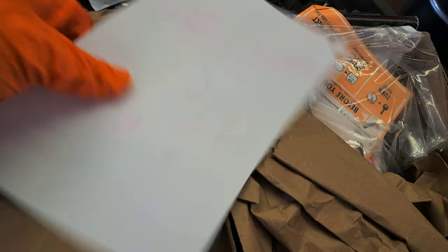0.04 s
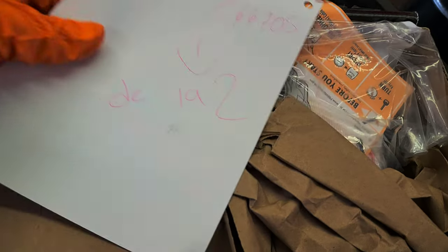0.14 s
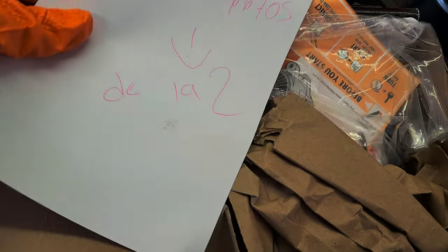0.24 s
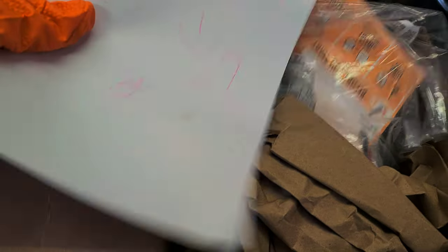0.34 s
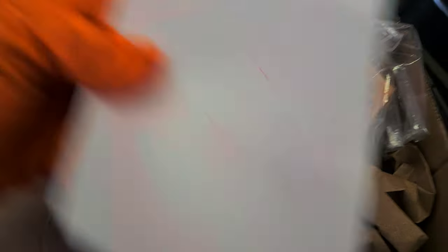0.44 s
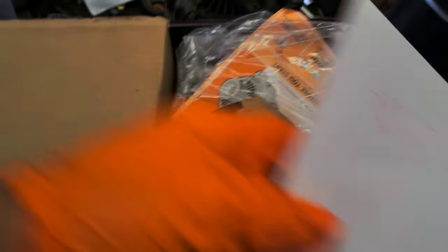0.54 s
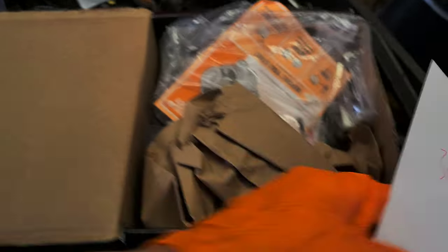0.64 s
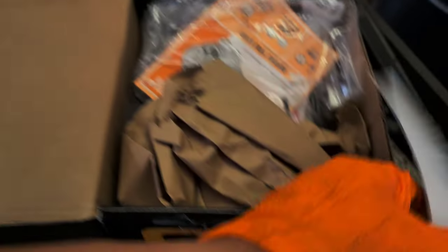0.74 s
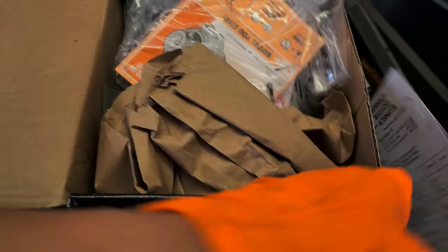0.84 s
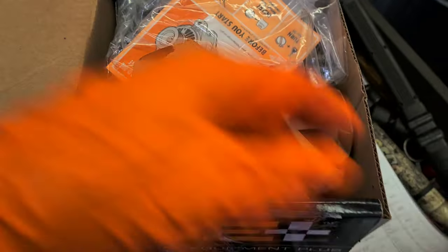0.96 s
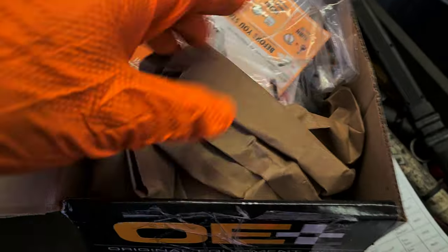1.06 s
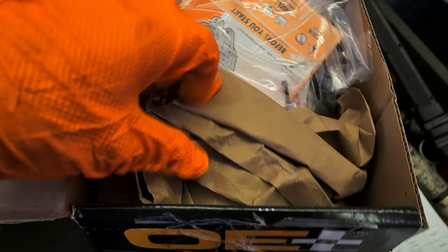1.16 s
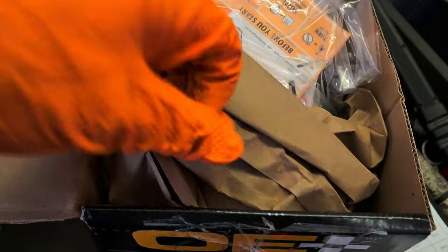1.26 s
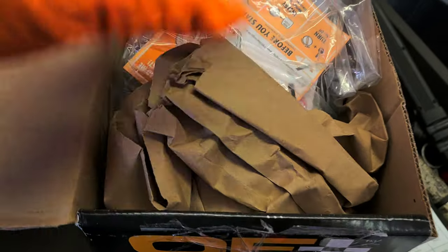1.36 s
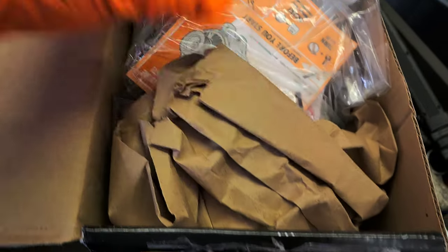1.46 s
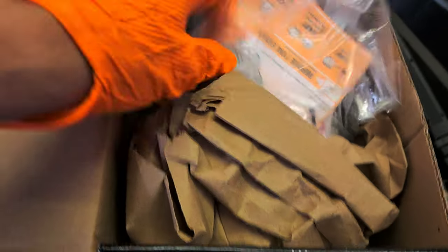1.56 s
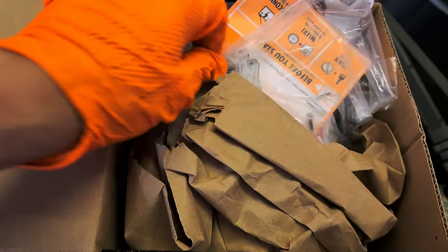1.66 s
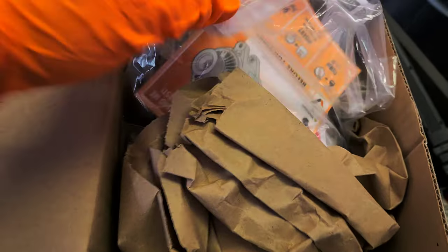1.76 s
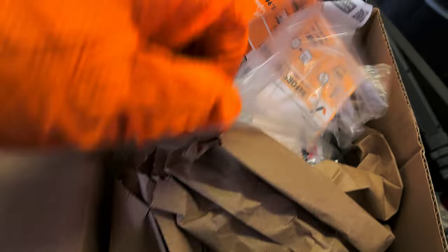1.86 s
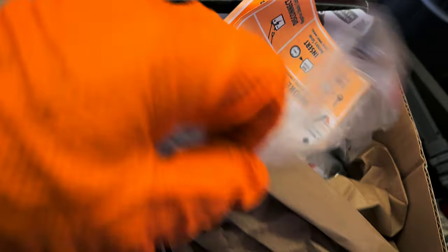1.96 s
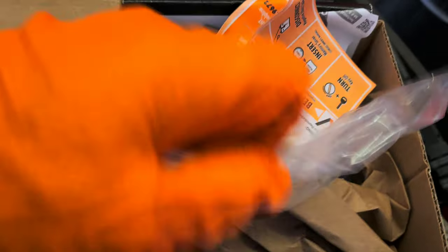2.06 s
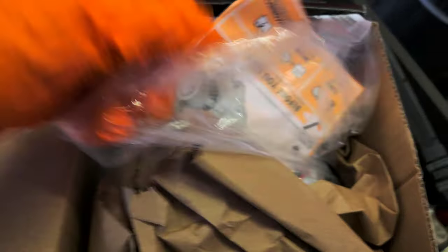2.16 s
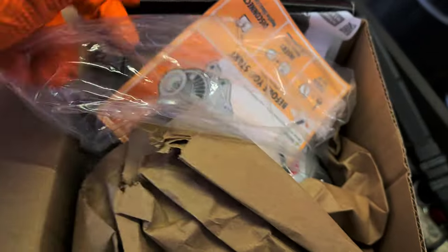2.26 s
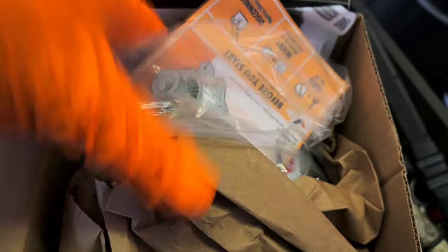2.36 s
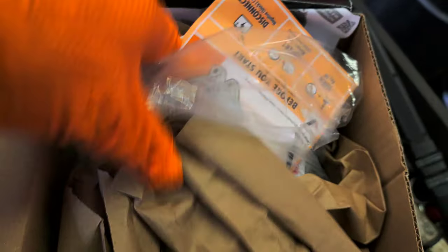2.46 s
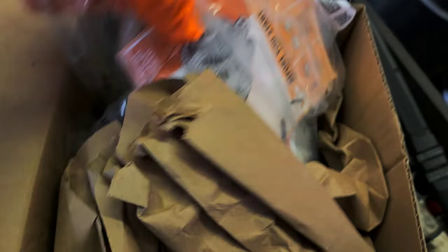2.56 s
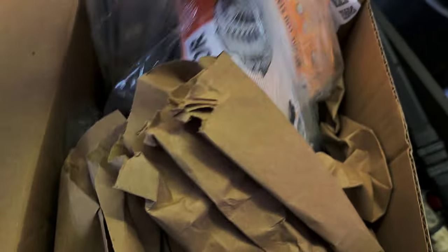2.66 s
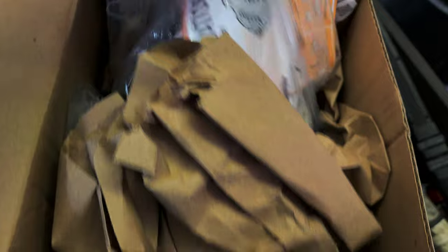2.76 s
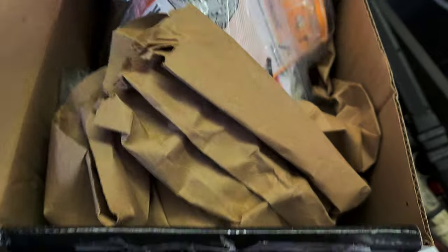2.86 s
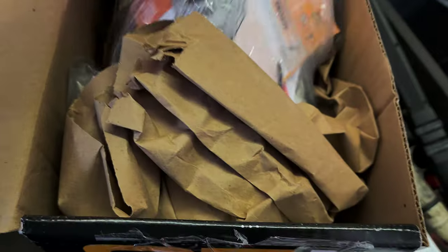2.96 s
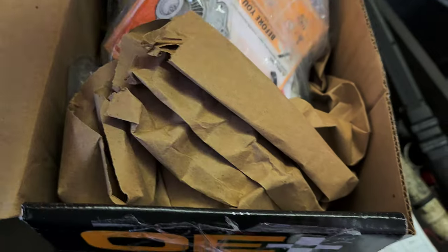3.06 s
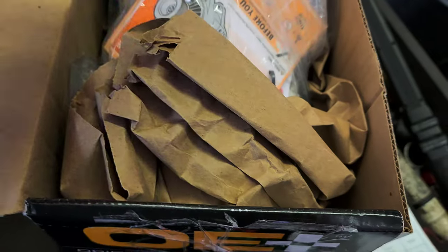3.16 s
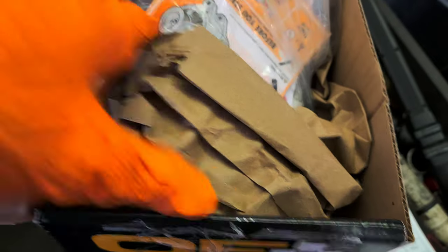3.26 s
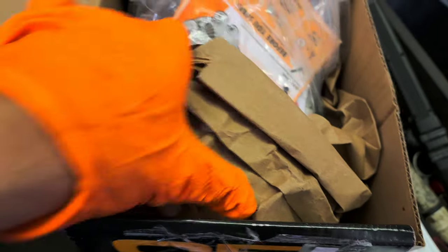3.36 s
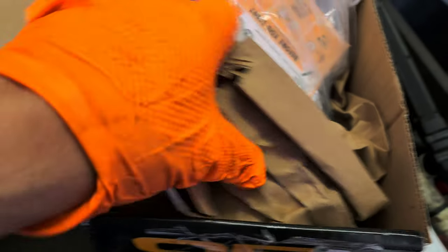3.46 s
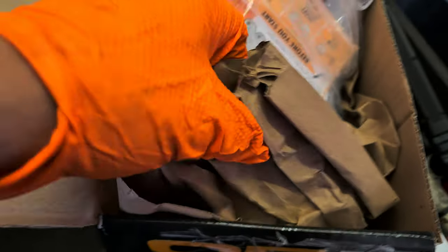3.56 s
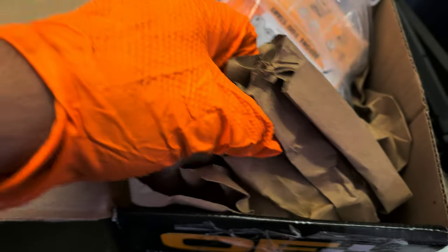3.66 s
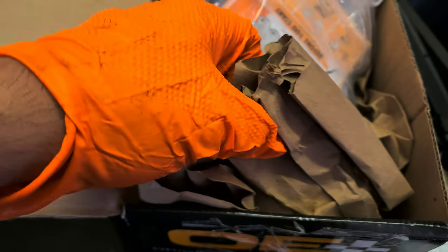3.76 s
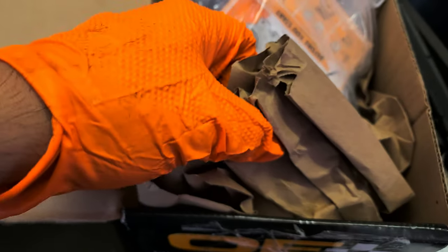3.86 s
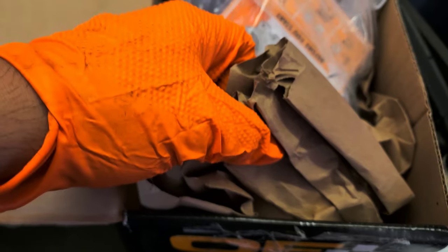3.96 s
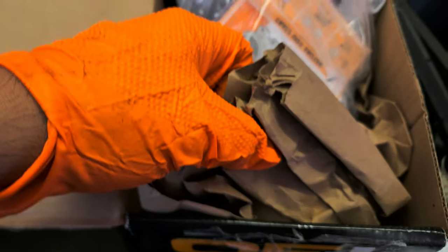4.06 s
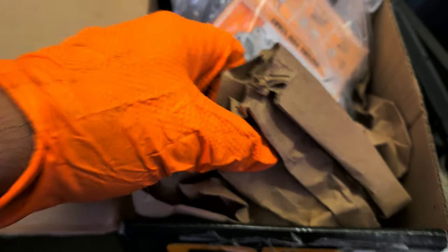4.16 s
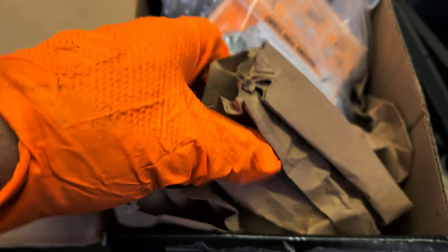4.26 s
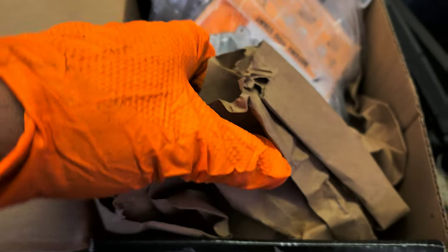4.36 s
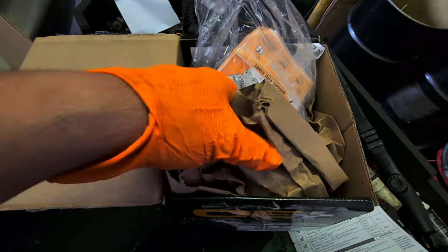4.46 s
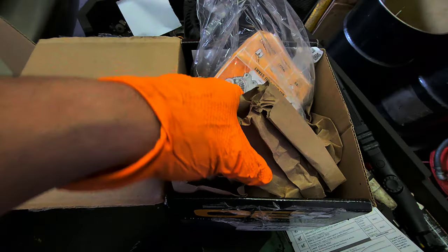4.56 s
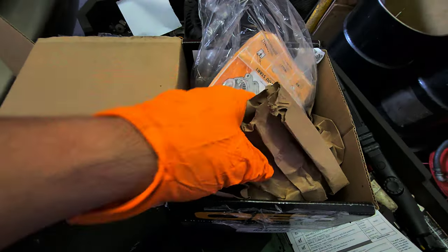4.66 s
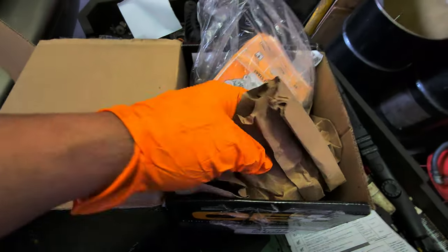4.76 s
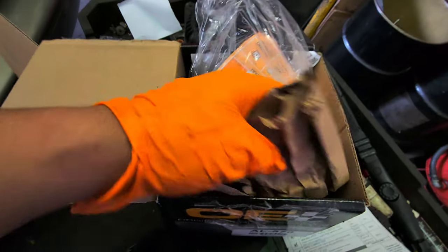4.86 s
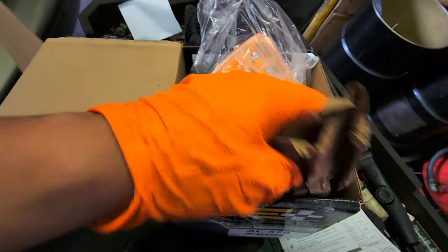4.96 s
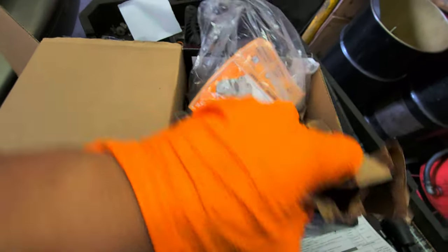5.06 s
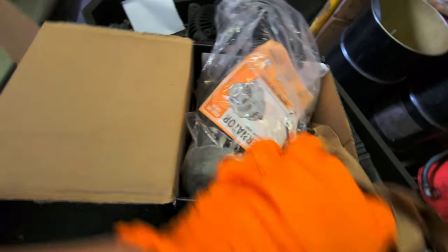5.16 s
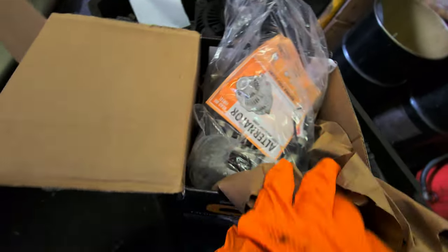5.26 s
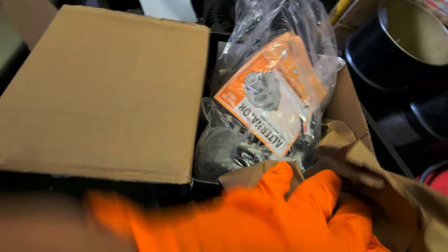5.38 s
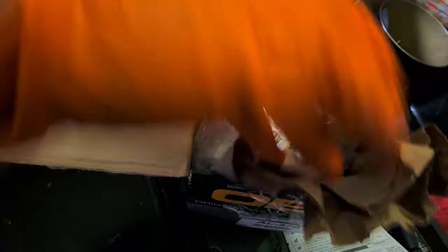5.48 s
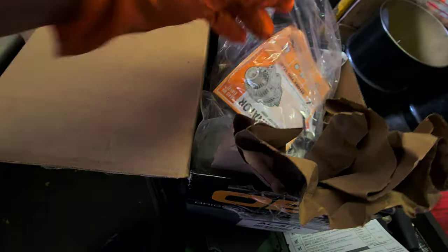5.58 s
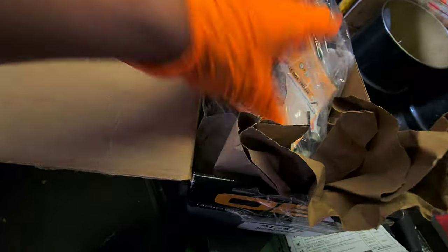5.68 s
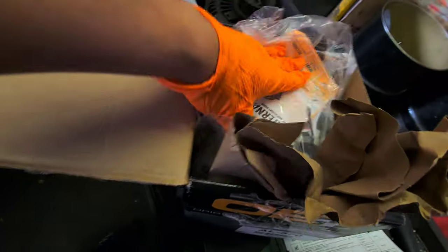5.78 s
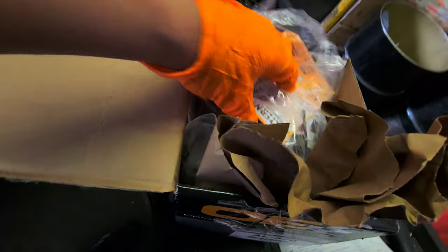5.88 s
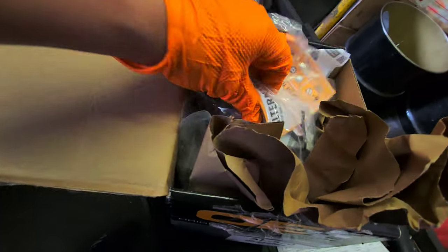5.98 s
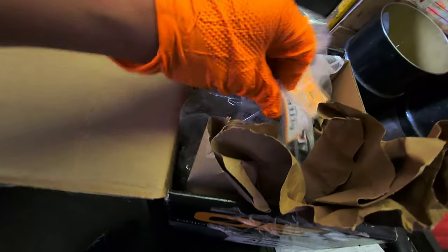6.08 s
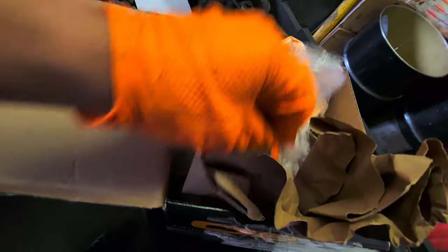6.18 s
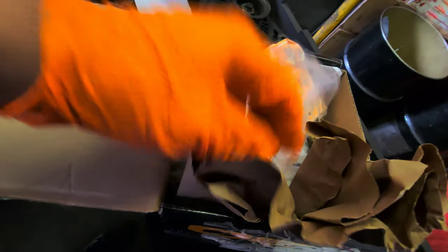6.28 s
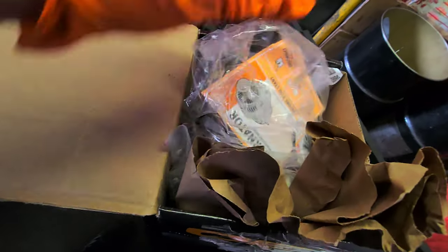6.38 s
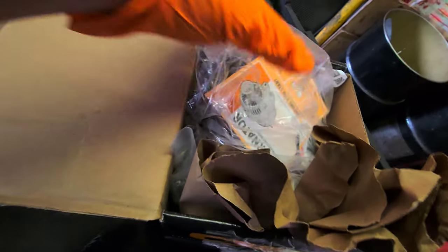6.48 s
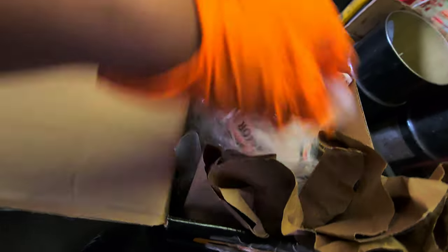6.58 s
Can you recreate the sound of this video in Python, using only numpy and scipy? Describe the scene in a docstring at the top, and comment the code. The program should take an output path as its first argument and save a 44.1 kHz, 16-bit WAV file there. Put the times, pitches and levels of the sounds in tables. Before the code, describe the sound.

A hand rummages in a box: a thump and clack, crinkling plastic, crunching stiff paper, then thin metal ringing and wavering in a quiet workshop.

```python
"""Rummaging in a cardboard box

A gloved hand moves packing paper and a plastic bag close to the microphone, in a workshop.
Crackle is many tiny random pops, swelling with each stroke of the hand; large creases add pitched snaps.
A thin metal part, perhaps a washer, drops and rings in pairs of close tones as the bag is pressed again.
Box bumps and a knocked tool are decaying tones and noise; scrapes, faint tones, ticks and pats are shaped noise.
A faint long reverberation and quiet, coloured noise for the air lie behind."""
import sys
import numpy as np
from scipy import signal
from scipy.fft import rfft, irfft
from scipy.io import wavfile
from scipy.ndimage import uniform_filter1d, minimum_filter1d

SR = 44100
rng = np.random.default_rng(int(sys.argv[2]) if len(sys.argv) > 2 else 0)


def dump(signal):
    """Clip the signal to [-1, 1] and save it as 16-bit WAV at the path in sys.argv[1]."""
    limited = np.clip(np.atleast_2d(signal).T, -1, 1)
    pcm = np.round(limited * 32767).astype(np.int16)
    wavfile.write(sys.argv[1], SR, pcm)


N = 292383
T = np.arange(N) / SR  # time in seconds


# Tone colour of stiff paper: pitch_hz, level_db
PAPER_COLOUR = [(47, -64), (80, -13), (190, -12), (309, -6), (482, -4), (550, 4), (687, -8.5), (896, -5),
                (1020, -2), (1700, -19.5), (4230, -21.5), (8600, -14), (10700, -43), (14300, -25.5),
                (16000, -39)]
# The hand moves the paper: start_s, rise_s, hold_s, crackle_db, body_over_crackle_db, fizz_over_crackle_db
PAPER_STROKES = [(0.061, 0.043, 0.031, -52, 4.5, 12), (0.411, 0.015, 0.0049, -40.5, 17, 8.5),
                 (1.222, 0.011, 0.048, -27.5, -5, -6), (1.322, 0.018, 0.012, -36, -5.5, 2),
                 (3.453, 0.079, 0.017, -42, -3.5, 4.5), (3.565, 0.02, 0.039, -26, -2.5, -3),
                 (4.333, 0.011, 0.012, -40.5, -4.5, -5), (4.748, 0.0039, 0.05, -27, -17, -7),
                 (4.803, 0.023, 0.059, -35.5, -1.5, -10), (4.882, 0.0022, 0.046, -23.5, -3, -5),
                 (4.921, 0.0035, 0.091, -21, -4.5, -7.5), (5.028, 0.024, 0.17, -28, -5.5, -11.5),
                 (5.154, 0.016, 0.12, -21, -1, -9), (5.287, 0.022, 0.11, -23.5, -13, -4.5),
                 (5.471, 0.037, 0.04, -26, -9, -4.5), (5.645, 0.026, 0.078, -52, 5, 18)]
# Time for the relaxing paper to fall 60 dB: body_s, crackle_s, fizz_s
PAPER_RELAX_S = [0.34, .24, .21]


def paper():
    """Stiff paper: sparse, strong pops over the hollow sound of the wad."""
    grain = crinkle(PAPER_COLOUR, rate=600, spread_db=0.5, t60=0.0045, echo_db=-14.5)
    grain = folds(grain, depth_db=6.0, q=6.9, rate=12)
    return rustle(grain, PAPER_STROKES, PAPER_RELAX_S)


# Tone colour of the loose bag: pitch_hz, level_db
BAG_COLOUR = [(70, -4), (200, -7), (320, -5), (480, 1), (720, -6.5), (1050, -2.5), (1700, -14), (3300, -5),
              (4400, 1), (5800, -1), (8700, 7), (10400, -15.5), (12500, -7), (15000, -7.5)]
# Tone colour of the bag pressed into the box: pitch_hz, level_db
PRESSED_COLOUR = [(55, 15), (180, -9.5), (370, 8.5), (520, 10.5), (760, -5.5), (1100, -3), (1800, -15.5),
                  (3400, -9.5), (4400, 1), (7000, 9), (9000, 3), (11000, -5), (13000, -3), (15000, -2.5)]
# The hand moves the loose bag: start_s, rise_s, hold_s, crackle_db, body_over_crackle_db, fizz_over_crackle_db
BAG_STROKES = [(1.235, 0.035, 0.0048, -22.5, -4.5, 3.5), (1.56, 0.013, 0.035, -55, 1.5, -6.5),
               (1.624, 0.026, 0.013, -42, 0.5, 7.5), (1.761, 0.052, 0.044, -55.5, -3, 11.5),
               (1.833, 0.049, 0.041, -29.5, -2, 4), (1.981, 0.023, 0.06, -43, -3, 5),
               (2.066, 0.024, 0.033, -30.5, -11.5, 0), (2.114, 0.024, 0.074, -35.5, -9, 2.5),
               (2.236, 0.014, 0.061, -32, -9, 4), (2.358, 0.034, 0.056, -53.5, 4.5, 5),
               (2.419, 0.091, 0.082, -34.5, -3.5, 3.5), (2.549, 0.02, .042, -18.5, -1, -3),
               (2.616, 0.028, 0.17, -31.5, -10.5, 3.5), (2.813, 0.066, 0.017, -25.5, -1, 4.5),
               (2.927, 0.1, 0.053, -32, -3.5, 4.5), (3.145, 0.046, 0.15, -65.5, 8, -21),
               (3.314, 0.022, 0.032, -43, 0, -0.5)]
# The hand presses the bag: start_s, rise_s, hold_s, crackle_db, body_over_crackle_db, fizz_over_crackle_db
PRESS_STROKES = [(5.755, 0.056, 0.016, -19.5, -7.5, 1), (5.835, 0.044, 0.084, -32, 4, 6),
                 (5.991, .012, 0.012, -24, 0, 5), (6.052, 0.046, 0.2, -34, 1, 7),
                 (6.334, 0.038, 0.021, -42, 6.5, 6), (6.529, 0.12, 0.029, -56.5, 1, -10.5)]
# Time for the relaxing bag to fall 60 dB: body_s, crackle_s, fizz_s
BAG_RELAX_S = [0.2, 0.19, 0.18]


def bag():
    """Thin plastic: a finer crinkle, boxier when it is pressed against the cardboard."""
    loose = crinkle(BAG_COLOUR, rate=800, spread_db=2.0, t60=0.0079, echo_db=-11)
    loose = folds(loose, depth_db=4.0, q=14, rate=10)
    pressed = crinkle(PRESSED_COLOUR, rate=1200, spread_db=4.0, t60=0.0018, echo_db=-11)
    pressed = folds(pressed, depth_db=6.0, q=8.0, rate=12)
    return rustle(loose, BAG_STROKES, BAG_RELAX_S) + rustle(pressed, PRESS_STROKES, BAG_RELAX_S)


# Creases that buckle with a snap, levels before mixing; the first row gives the sharp edge of a knock on the
# box: start_s, level_db, pitch_hz, hollow_knock_db
SNAPS = [(1.043, -2.5, 2150, -10.5), (1.114, -20.5, 3880, -25.5), (1.234, -1, 4040, -10.5),
         (1.259, -4.5, 4150, -11), (1.275, 0.5, 4270, -5.5), (1.28, -10, 4350, -13),
         (1.385, -8.5, 4300, -21), (1.395, -18.5, 2700, -16.5), (1.845, -13, 4700, -28),
         (1.896, 2.5, 2780, -13.5), (2.073, -19, 4400, -16), (2.091, -18, 4470, -19), (2.252, 2, 2685, -30),
         (2.326, -10, 9220, -47), (2.495, -9, 5020, -41), (2.782, -18, 4530, -23), (2.567, 1, 4360, -7),
         (2.593, 24.5, 2600, 9.5), (2.605, -26, 2540, -11.5), (2.887, -7, 3590, -19),
         (2.955, -11.5, 4700, -44), (3.584, -16, 2180, -20), (3.624, -4.5, 1880, -13.5),
         (3.653, -5, 1710, -8.5), (4.751, -13.5, 2004, -19), (4.761, -12, 2920, -22.5),
         (4.778, 4, 3900, -8), (4.885, -4, 2080, -14), (4.929, 1.5, 3560, -6), (4.984, 6.5, 3000, -4.5),
         (5.022, -3.5, 2900, -8), (5.088, -3.5, 1910, -9.5), (5.168, 2, 2850, -9.5), (5.2, 0, 5980, -6.5),
         (5.209, -2, 2590, -12), (5.221, -0.5, 3000, -1.5), (5.256, 2, 2050, -15.5),
         (5.28, -0.5, 3740, -22), (5.999, -2, 6470, -30), (6.153, -11.5, 2620, -16.5),
         (6.225, -26, 5600, -20)]
# The hollow of the paper wad: pitch_hz, level_db
WAD_COLOUR = [(100, -27), (280, -14), (520, -7.5), (750, -11.5), (1040, -2), (1350, -6), (2000, -14.5),
              (6000, -32.5)]


def snaps():
    """A large crease gives way: a pitched tick, a crack, reflections, and a hollow knock from the wad."""
    out, t = np.zeros(N), T[:SR // 4]
    crack_colour = [(400, -10.0), (1700, -0.5), (8500, 5.5), (10500, -6), (15000, -1.5)]  # Hz, dB
    for start, db, hz, hollow_db in SNAPS:
        tick = np.sin(2 * np.pi * hz * t) * fade(t, 0.016) * np.minimum(t / 0.00038, 1)
        crack = pop(hz, 0.012, q=2.0, echo_db=-17, echo_t60=0.16)
        crack = burst(colour(crack, crack_colour), 0.0011)
        knock = pop(1000, 0.0084, q=1, echo_db=-11.5, echo_t60=0.15)
        knock = burst(colour(knock, WAD_COLOUR), 0.0038)
        snap = undb(db) * (undb(-10.0) * tick + undb(-11.0) * crack)
        add(out, start + 0.0011, snap + undb(hollow_db - 7.0) * knock)
    return out


# The washer is jostled in the paper, drops and spins, then tips over and spins again:
# start_s, length_s, ring_db, rim_chatter_db
SPINS = [(4.84, 0.41, -31.5, -54), (5.307, 0.34, 2, -11), (5.653, 0.647, -.5, -25.5)]
# Its tones in close pairs, one list for each row of WASHER_RING: pitch_hz, level_db
WASHER_MODES = [
    [(2586, -3), (2597, -5)],
    [(5560, -3), (5604, 0.5)],
    [(10131, -11), (10228, -2.5)],
    [(15552, -9), (15692, -11)],
]
# How each pair answers a spin: level_db, rise_s, hold_s, time_to_fall_60_db_s, db_gained_per_db_of_force
WASHER_RING = [(-18, 0.083, 0.074, 1.3, 1.46), (-10.5, 0.033, 0.18, 0.91, 1.5),
               (-15, 0.016, 0.078, 1.28, 1), (-18.5, .012, .06, 0.84, 2.5)]
# Tone colour of the rim contacts: pitch_hz, level_db
CHATTER_COLOUR = [(2500, -39.5), (5000, -7), (7000, -2.5), (9800, -6.5), (12500, -9.5), (15700, -9.5)]
CHATTER_T60_S, STOP_T60_S = 0.59, 0.33  # the rim quietens; the ring is damped when a spin ends


def washer():
    """Each spin rings and dies; mode pairs beat and waver at random, rim contacts add a buzz at their pitches."""
    rim = crinkle(CHATTER_COLOUR, rate=1700, spread_db=4.5, t60=0.0018, echo_db=-14.5)
    rim = steady(rim, 0.075)
    out, swings = 0, 0
    for start, length, ring_db, chatter_db in SPINS:
        free = fade(np.maximum(T - start - length, 0), STOP_T60_S)
        out = out + undb(chatter_db) * swell(start, 0.015, 0.011, CHATTER_T60_S) * free * rim
        answers = [undb(ring_db * slope + db) * swell(start, rise, hold, t60)
                   for db, rise, hold, t60, slope in WASHER_RING]
        swings = swings + free * np.array(answers)
    for swing, modes in zip(swings, WASHER_MODES):
        for hz, db in modes:
            # phase and level waver at random
            phase_waver = 1.15 * walk(24) + .15 * hz / 5600 * walk(130)
            ring = undb(1.7 * walk(28)) * np.sin(2 * np.pi * hz * T + phase_waver)
            # the buzz of the short contacts is strongest in the high modes
            filtered_rim = resonate(resonate(rim, hz, hz / 110), hz, hz / 110)
            buzz = unit(filtered_rim) * undb(-12) * hz / 5600
            out = out + undb(db) * swing * (ring + buzz)
    return out


# Bumps on the box, before the overall fade: start_s, level_db, rise_s, time_to_fall_60_db_s, bass_db, treble_db
BUMPS = [(0.0, -38, 0.0035, 0.38, 1, -4), (0.714, -5.5, 0.018, 1, 1.5, 9.5),
         (1.041, -14.5, .001, 0.28, -28.5, 9)]
# Tones of the box and its load: pitch_hz, level_db
BOX_MODES = [(52, -7.5), (64, -3), (88, -1.5), (140, -2.5), (188, -3), (240, -3), (311, -9), (328, -4.5),
             (362, 1.5), (398, -0.5), (419, 6), (473, 1), (496, 1.5), (789, -2.5), (854, -20)]
# Tone colour of rattling or scraped cardboard: pitch_hz, level_db
THUMP_COLOUR = [(40, -9.5), (70, -13.5), (139, -7.5), (260, -5.5), (400, 0.5), (560, -5), (880, -2.5),
                (1150, -14), (1600, -24), (2300, -24.5), (3400, -22.5), (4900, -34), (7500, -36),
                (11000, -65)]


def box():
    """Each bump shakes the loaded box: low modes boom, the cardboard and its contents rattle."""
    out, t = np.zeros(N), T[:SR]
    for start, db, rise, t60, bass_db, treble_db in BUMPS:
        boom = sum(undb(d) * np.sin(2 * np.pi * (hz * t + rng.random())) for hz, d in BOX_MODES)
        rattle = colour(rng.standard_normal(SR), THUMP_COLOUR)
        bass, middle, treble = split(undb(-5.0) * unit(boom) + undb(-2.0) * unit(rattle), 300, 2200)
        # the treble rises more slowly and dies sooner than the body
        treble = undb(treble_db - 3.0) * treble * np.minimum(t / (2.1 * rise), 1) * fade(t, 4.8)
        ring = undb(bass_db) * bass + middle + treble
        envelope = np.minimum(t / rise, 1) ** 2 * fade(t, t60) * fade(t ** 2, 0.36)
        add(out, start, undb(db) * ring * envelope)
    return out


# A hard tool is knocked and rebounds: start_s, level_db, time_to_fall_60_db_s
CLACKS = [(0.9257, -8, 0.047), (0.937, -11.5, 0.24)]
# Tone colour of the knocks: pitch_hz, level_db
CLACK_COLOUR = [(300, -14), (1500, -3.5), (2400, 0.5), (3400, 1.5), (4500, -2), (5500, -4), (7600, 2),
                (9200, -24.5), (15000, -48)]
# The ring of the tool: pitch_hz, level_db, time_to_fall_60_db_s
TOOL_MODES = [(2128, -14, .3), (2665, -22, .2), (4129, -22, .2), (4576, -15, .08), (6977, -25, .18),
              (7467, -31, .2)]


def tool():
    """Two hard contacts give fading noise; a brief metallic ring of several tones starts with the first."""
    out, t = np.zeros(N), T[:SR]
    for start, db, t60 in CLACKS:
        clack = unit(colour(rng.standard_normal(SR), CLACK_COLOUR))
        add(out, start, undb(db) * clack * fade(t, t60))
    ring = sum(undb(db) * np.sin(2 * np.pi * hz * t) * fade(t, t60) for hz, db, t60 in TOOL_MODES)
    add(out, CLACKS[0][0], ring)
    return out


# Glove or sheet scrapes the cardboard:
# start_s, rise_s, hold_s, crackle_db, body_over_crackle_db, fizz_over_crackle_db
SCRAPE_STROKES = [(0.0, .005, .02, -57.5, 23, 4), (0.038, .03, .06, -62.5, 18.5, -9.5),
                  (1.078, .025, .03, -44, 11.5, 4.5), (1.187, .01, .03, -38, 4, 0.5),
                  (1.222, .05, .006, -30, 5.5, -8.5), (1.372, .01, .025, -39.5, 0, 1)]
# Time for a scrape to fall 60 dB: body_s, crackle_s, fizz_s
SCRAPE_RELAX_S = [0.21, 0.073, 0.22]


def scrapes():
    """Fine friction on the cardboard, coloured by the hollow box."""
    grain = colour(rng.standard_normal(N), THUMP_COLOUR)
    grain = folds(grain, depth_db=5.5, q=16, rate=9)
    return rustle(grain, SCRAPE_STROKES, SCRAPE_RELAX_S)


# Faint narrow tones, hollow near 1 kHz or higher: start_s, hold_s, pitch_hz, sharpness_q, level_db
FAINT_TONES = [(0.0, 0.12, 980, 5, -43), (0.421, .05, 987, 3.9, -38.5), (1.042, .06, 1034, 6, -31),
               (0.0, .11, 4170, 5.4, -53.5), (0.22, 0.069, 3730, 18, -65), (0.266, .02, 6620, 9, -50.5),
               (3.132, 0.11, 4420, 9.4, -55), (6.412, 0.19, 6600, 9.2, -62), (6.541, 0.077, 4830, 13, -58)]
FAINT_RISE_S, FAINT_T60_S = 0.022, 0.82


def faint_tones():
    """Narrow noise: hollow near 1 kHz like the room or box resonating, or higher like sliding friction."""
    return sum(undb(db) * swell(start, FAINT_RISE_S, hold, FAINT_T60_S) * hum(hz, q)
               for start, hold, hz, q, db in FAINT_TONES)


# Light ticks as the load shifts: start_s, level_db
TICKS = [(3.741, -39), (4.296, -55), (4.68, -62)]
# Their damped resonances: pitch_hz, sharpness_q, level_db
TICK_TONES = [(2176, 7.6, -1.4), (4470, 15.5, -0.74)]
TICK_T60_S = .17


def ticks():
    """Light contacts inside the packing ring briefly, blurred by the wrapping."""
    ring = sum(undb(db) * hum(hz, q) for hz, q, db in TICK_TONES)
    return ring * sum(undb(db) * swell(start, 0.0047, 0, TICK_T60_S) for start, db in TICKS)


# The glove lands softly on the packing: start_s, pitch_hz, level_db, time_to_fall_60_db_s
PATS = [(3.311, 117, -38, 0.1), (4.421, 190.8, -55.5, 0.099)]


def pats():
    """A soft glove on a loose load: one dull, low resonance."""
    return sum(undb(db) * swell(start, 0.0089, 0.045, t60) * hum(hz, 1.7) for start, hz, db, t60 in PATS)


# Tone colour of the reverberation: pitch_hz, level_db
ROOM_COLOUR = [(80, -15), (350, -5), (650, -1.5), (950, -5), (1300, -12.5), (2200, -21.5), (8000, -41)]
# Tone colour of the still air: pitch_hz, level_db
AIR_COLOUR = [(40, 1), (200, -6.5), (750, 3.5), (1800, -13.5), (5000, -11), (11000, -19), (14000, -22)]
AIR_DB = -63  # middle level; it wavers a little


def workshop(x):
    """A faint, long, mid-pitched reverberation, made with fading noise, over still air."""
    t = T[:2 * SR]
    tail = colour(rng.standard_normal(len(t)), ROOM_COLOUR) * fade(t, 1.8) * np.minimum(t / 0.024, 1)
    wet = signal.fftconvolve(x, tail / np.abs(rfft(tail)).max())[:N]
    air = unit(colour(rng.standard_normal(N), AIR_COLOUR)) * undb(AIR_DB + 1.5 * walk(4.2))
    return undb(-10.5) * wet + air


def crinkle(points, rate, spread_db, t60, echo_db, count=10):
    """Facets of many sizes pop in little avalanches; a few pops are stronger than the rest."""
    out, avalanche = 0, undb(4.0 * walk(70))
    for hz in np.geomspace(500, 14000, count):
        size = undb(spread_db * np.minimum(rng.exponential(size=N), 4.0))
        happens = rng.random(N) < rate * avalanche / count / SR
        flips = happens * size * rng.choice([-1, 1], N)
        facet = pop(SR / 5, t60, 0.28, echo_db, echo_t60=0.2)
        facet = facet + 2 * resonate(facet, hz, 1.8) * max(SR / 5 / hz, 1)
        out = out + signal.fftconvolve(flips, facet)[:N]
    # even out the spectrum, then give it the colour of the material
    hz, power = signal.welch(out, SR, nperseg=512)
    flat = colour(out, np.c_[hz[1:-1], -10 * np.log10(power[1:-1])])
    return colour(flat, points)


def pop(hz, t60, q, echo_db, echo_t60):
    """A facet flips: a short crack in its own resonance, then reflections from the box and bench."""
    t = T[:SR // 4]
    envelope = fade(t, t60) + undb(echo_db) * fade(t, echo_t60)
    return resonate(rng.standard_normal(len(t)) * envelope, hz, q)


def folds(x, depth_db, q, rate, count=26):
    """As the folds open and close, narrow resonances come and go."""
    bands = np.geomspace(280, 9000, count) * (1 + .03 * rng.standard_normal(count))
    return x + sum(resonate(x, hz, q) * (undb(depth_db * walk(rate)) - 1) for hz in bands)


def rustle(grain, strokes, relax_s):
    """Each stroke of the hand stirs body, crackle and fizz; each band then relaxes at its own pace."""
    power = np.zeros((3, N))
    for start, rise, hold, db, body_db, fizz_db in strokes:
        for band, over_db in enumerate([body_db, 0, fizz_db]):
            power[band] += (undb(db + over_db) * swell(start, rise, hold, relax_s[band])) ** 2
    bands = steady(split(grain, 1594, 4600), 0.031)
    return np.sum(np.sqrt(power) * bands, axis=0)


SWELL_POWER = 1.4  # a stroke gathers force as this power of time


def swell(start, rise, hold, t60):
    """Attack, hold and release of a movement."""
    attack = np.clip((T - start) / rise, 0, 1) ** SWELL_POWER
    return attack * fade(np.maximum(T - start - rise - hold, 0), t60)


def hum(hz, q):
    """Noise in one steep resonance, held near rms 1."""
    return steady(resonate(resonate(rng.standard_normal(N), hz, q), hz, q), .05)


def undb(db):
    """Decibels to gain."""
    return 10 ** (np.asarray(db) / 20)


def unit(x):
    """Scale to rms 1."""
    return x / np.sqrt(np.mean(x ** 2))


def burst(x, length_s):
    """Give a short sound the energy of length_s at rms 1."""
    return x / np.sqrt(np.sum(x ** 2) / (length_s * SR))


def fade(t, t60):
    """Exponential decay, down 60 dB after t60."""
    return np.exp(-np.log(1000) * t / t60)


def colour(x, points):
    """Filter by a (Hz, dB) spectrum; causal, so that clicks keep their attack."""
    size = 2048
    hz, db = np.transpose(points)
    grid = np.maximum(np.arange(size + 1) * SR / (2 * size), 1)
    below = np.minimum(grid / hz[0], 1) ** 2  # roll off below the first point
    gain = below * undb(np.interp(np.log(grid), np.log(hz), db))
    # folding the cepstrum gives the filter its earliest possible response
    cepstrum = irfft(np.log(gain))
    cepstrum[1:size] *= 2
    cepstrum[size + 1:] = 0
    response = irfft(np.exp(rfft(cepstrum)))[:size]
    return signal.fftconvolve(x, response)[:len(x)]


def split(x, low_hz, high_hz):
    """Bass, middle and treble parts of a sound."""
    edges = [(low_hz, "low"), ([low_hz, high_hz], "band"), (high_hz, "high")]
    return np.array([signal.sosfilt(signal.butter(4, hz, kind, fs=SR, output="sos"), x)
                     for hz, kind in edges])


def resonate(x, hz, q):
    """One resonance, narrower for a larger q."""
    return signal.lfilter(*signal.iirpeak(min(hz, .45 * SR), max(q, .8), fs=SR), x)


def steady(x, span_s):
    """Take out the slow swell and leave the fine grain."""
    power = np.abs(uniform_filter1d(x ** 2, int(span_s * SR), axis=-1))
    return x / np.sqrt(power + 1e-14)


def walk(rate):
    """Smooth chance with a spread near 1, drawn anew rate times a second."""
    k = int(SR / rate)
    steps = np.repeat(rng.standard_normal(N // k + 1), k)
    return unit(uniform_filter1d(uniform_filter1d(steps, k), k)[:N])


def add(out, start, x):
    """Mix a sound in at its start time in seconds."""
    i = max(int(start * SR), 0)
    out[i:i + len(x)] += x[:N - i]


def scene():
    """All the sources and the workshop behind them, in one channel."""
    near = paper() + bag() + snaps() + faint_tones() + ticks() + pats() + tool() + washer() + scrapes()
    bumps = box()
    return (near + bumps + workshop(near + undb(-9.0) * bumps))[None]


TOP_HZ = 16000


def record(dry):
    """The microphone loses the deep bass, a limiter holds the highest peaks, and the top is cut."""
    x = signal.sosfilt(signal.butter(4, 42, "high", fs=SR, output="sos"), dry)
    headroom = .98 / np.maximum(np.abs(x), .98)
    x = x * uniform_filter1d(minimum_filter1d(headroom, size=161), size=161)
    return signal.sosfilt(signal.ellip(10, .2, 90, TOP_HZ, fs=SR, output="sos"), x)


dry = scene()
out = record(dry)
dump(out)
```